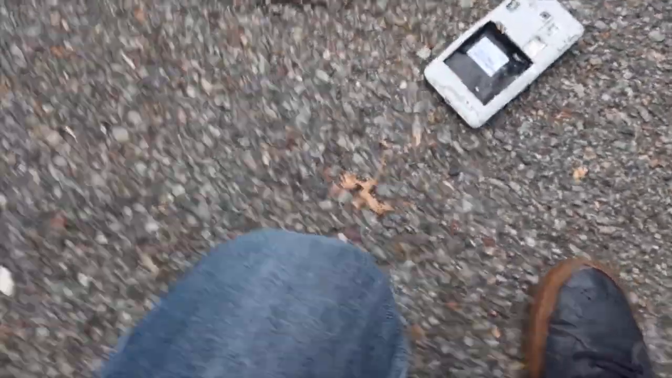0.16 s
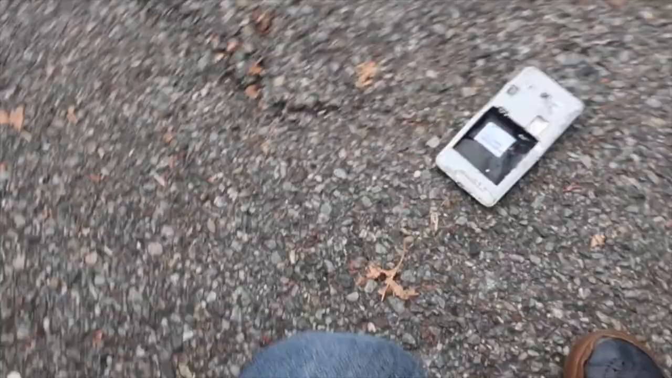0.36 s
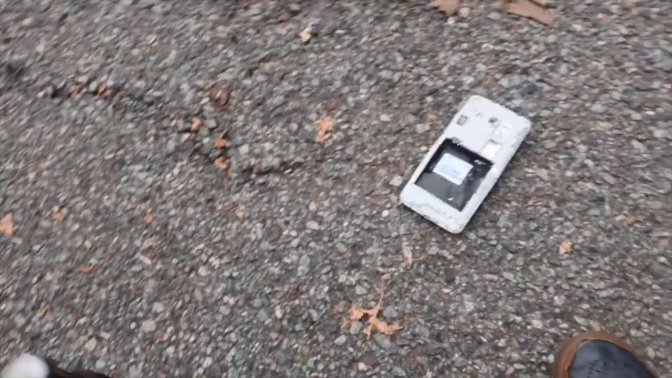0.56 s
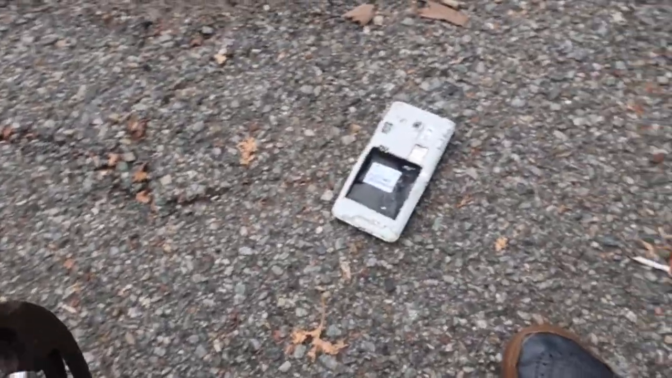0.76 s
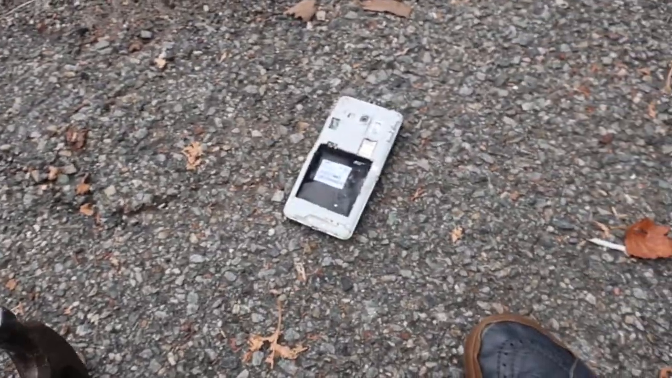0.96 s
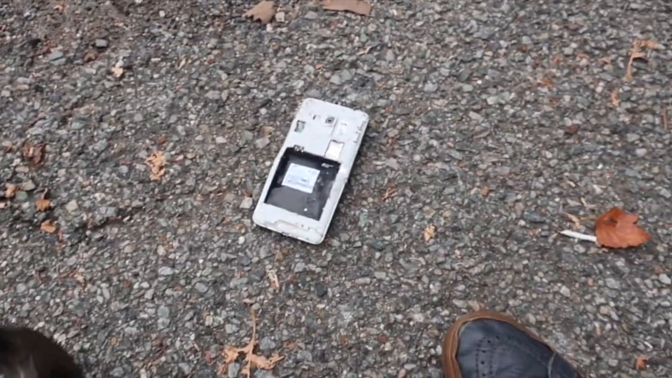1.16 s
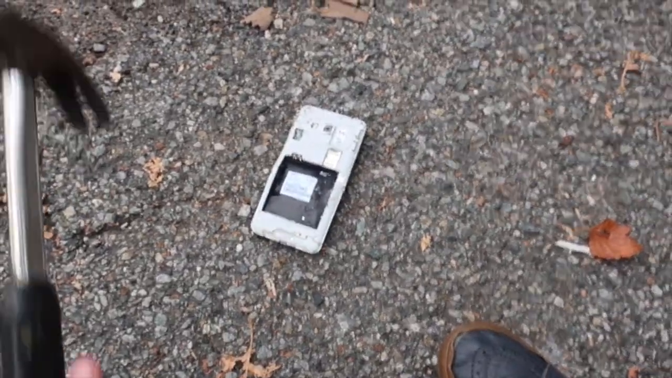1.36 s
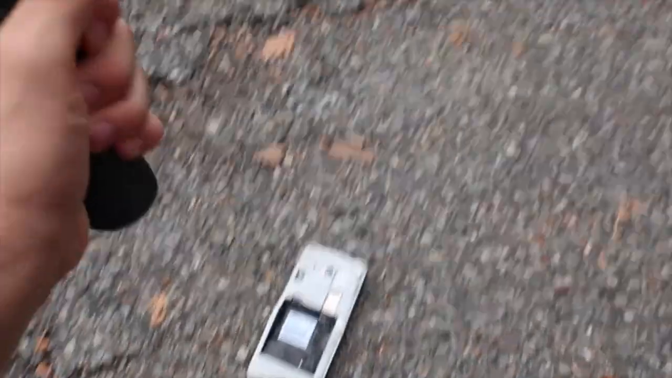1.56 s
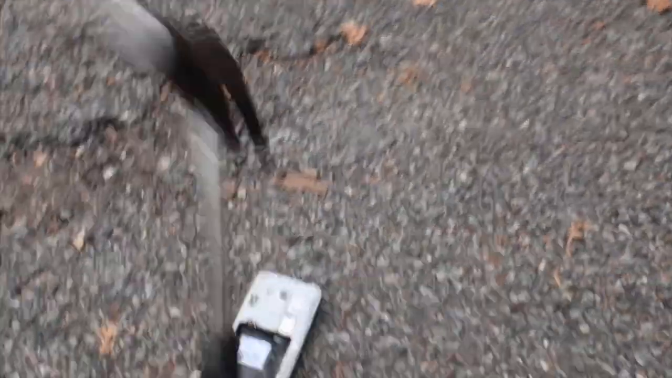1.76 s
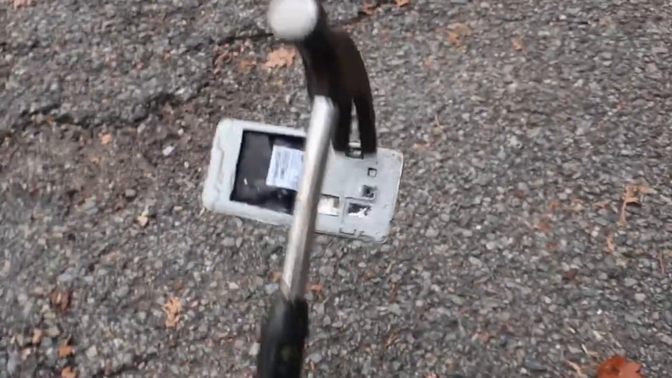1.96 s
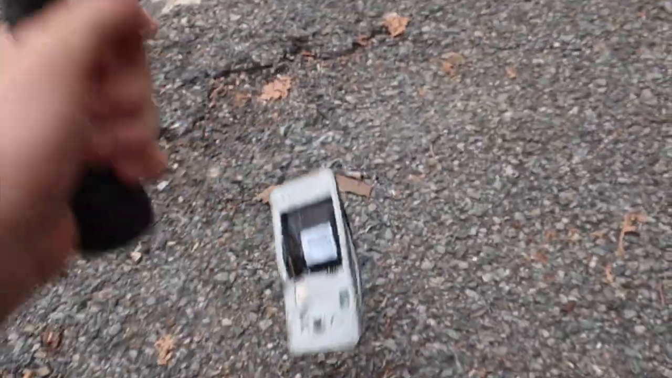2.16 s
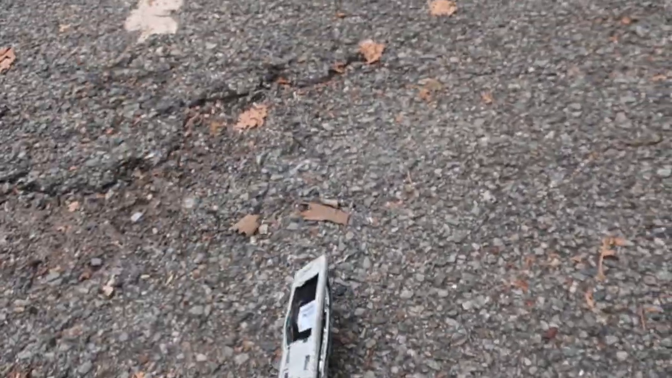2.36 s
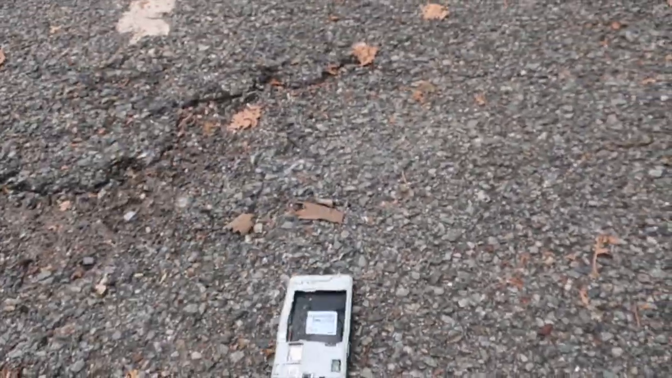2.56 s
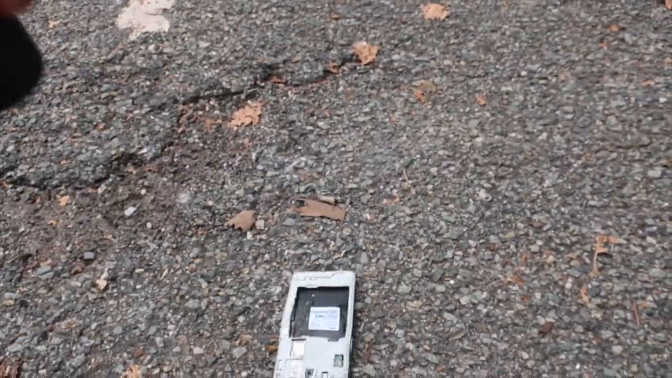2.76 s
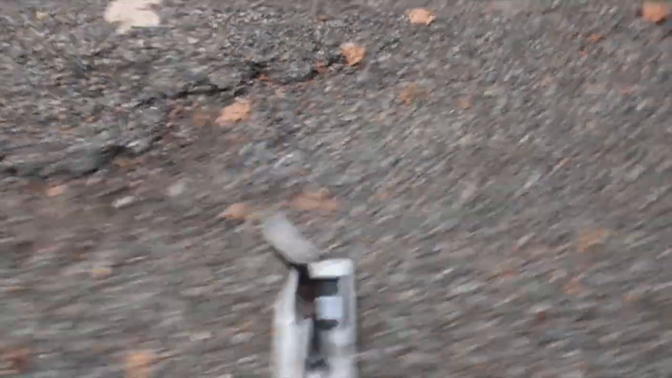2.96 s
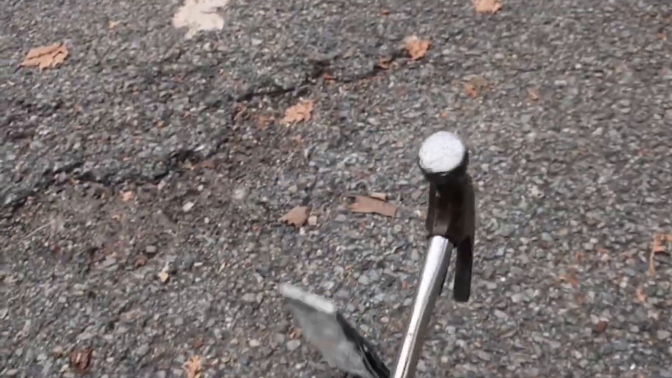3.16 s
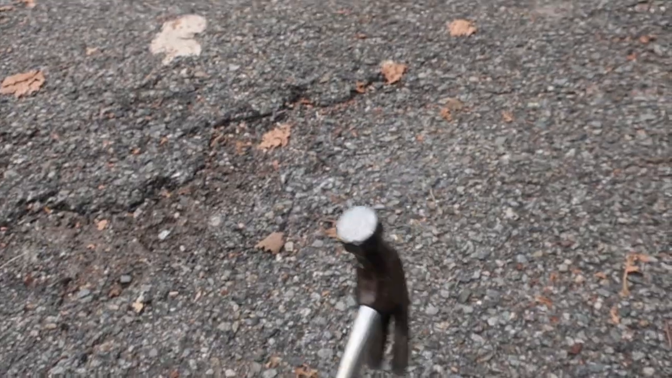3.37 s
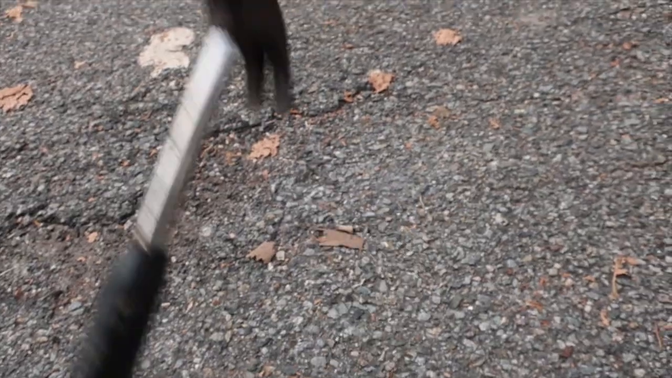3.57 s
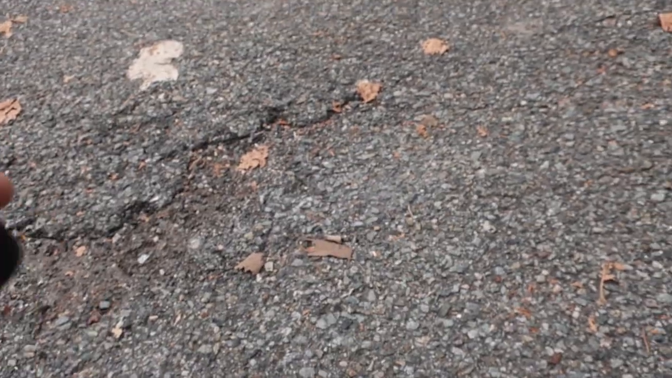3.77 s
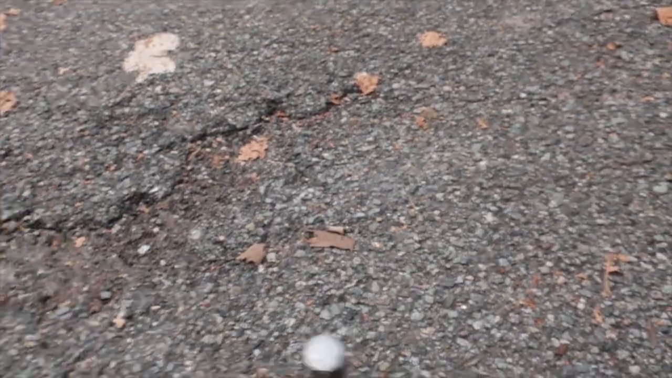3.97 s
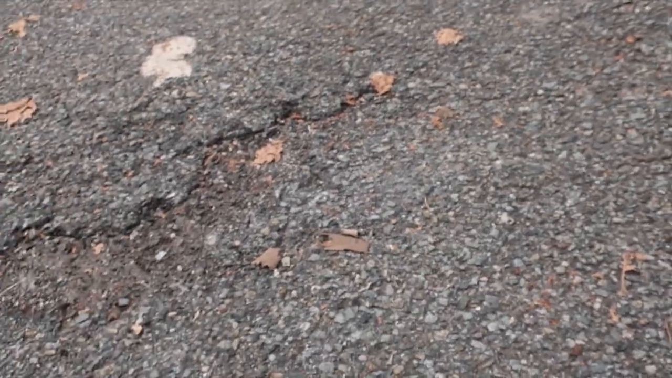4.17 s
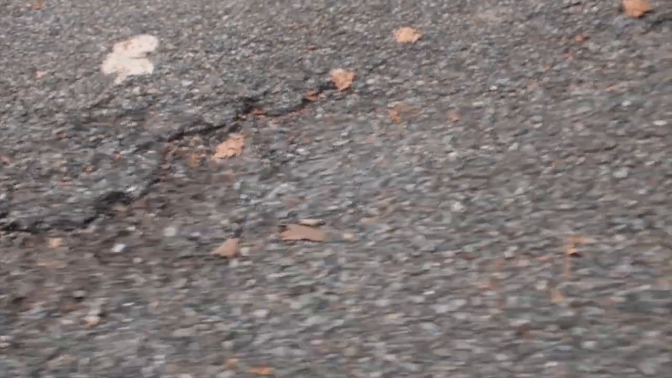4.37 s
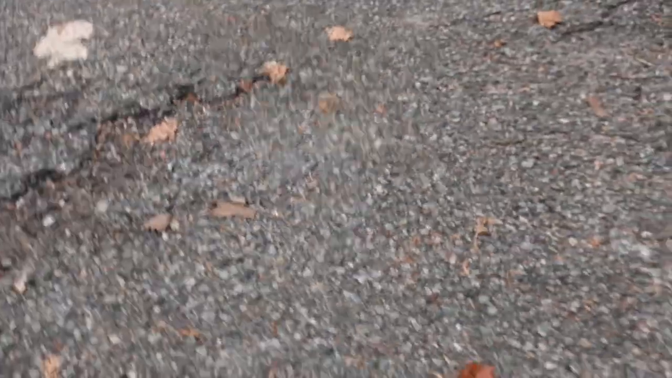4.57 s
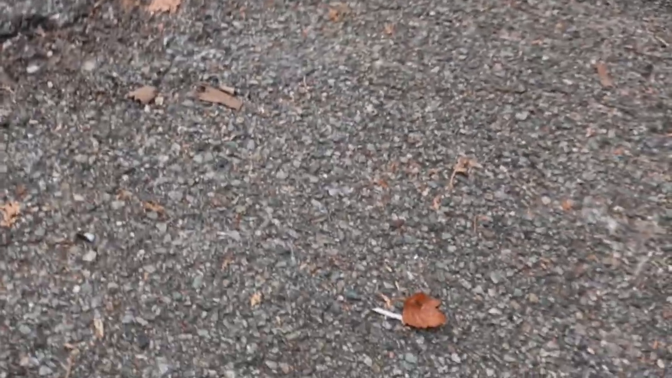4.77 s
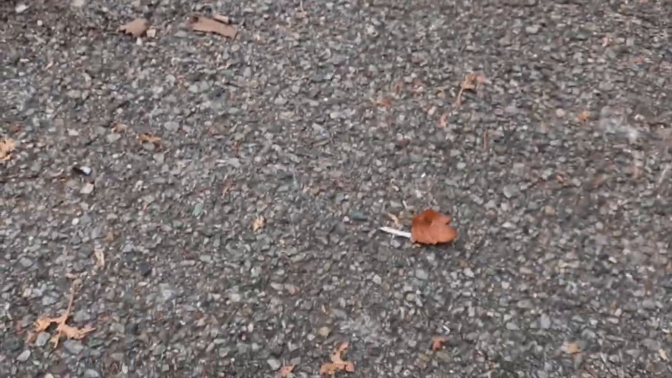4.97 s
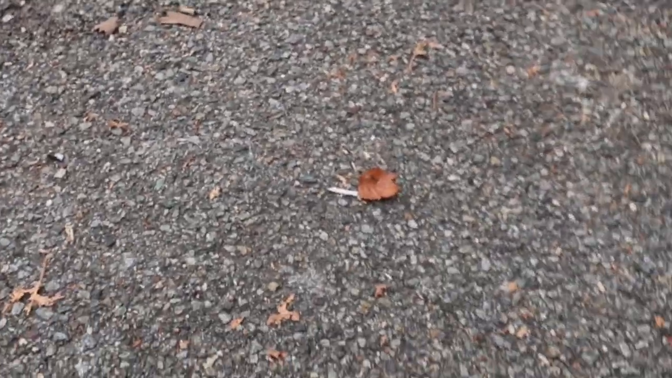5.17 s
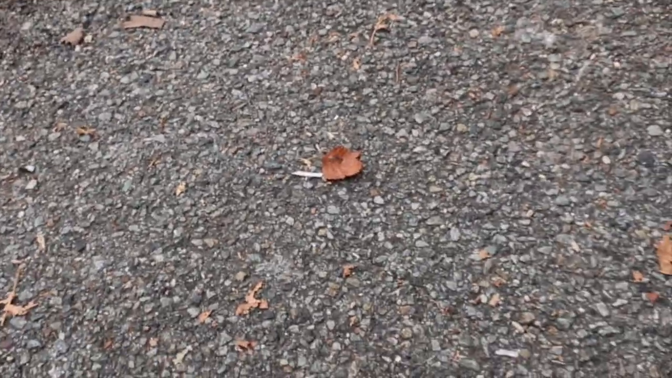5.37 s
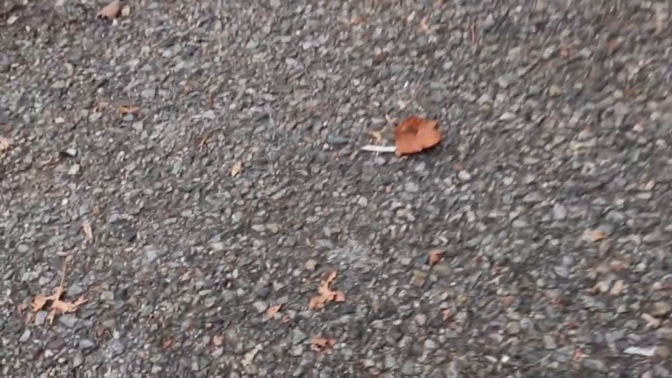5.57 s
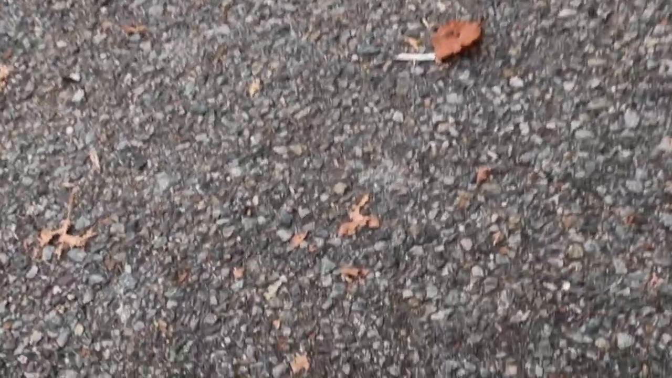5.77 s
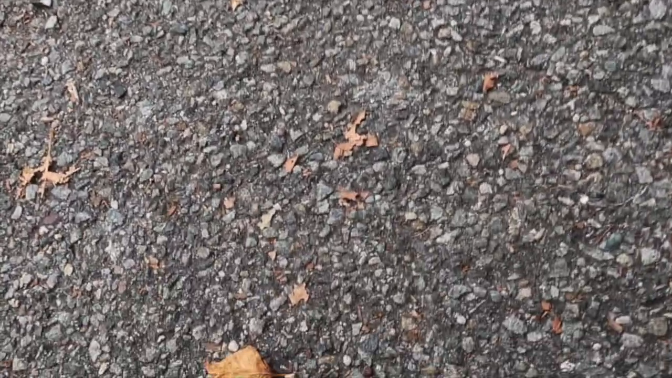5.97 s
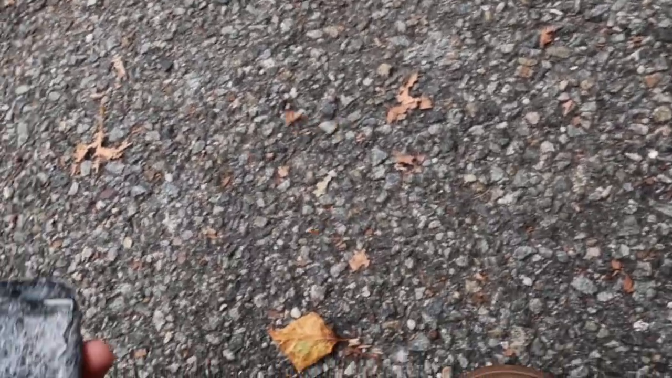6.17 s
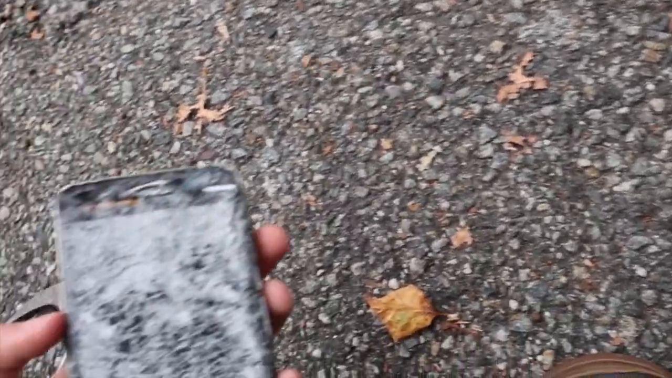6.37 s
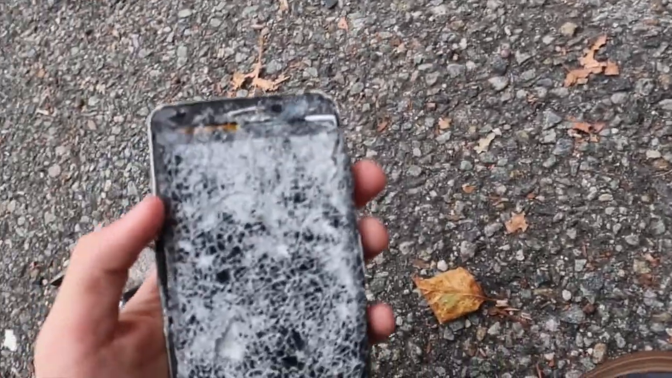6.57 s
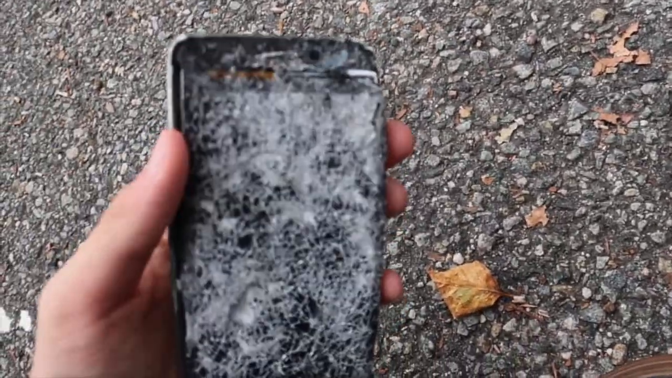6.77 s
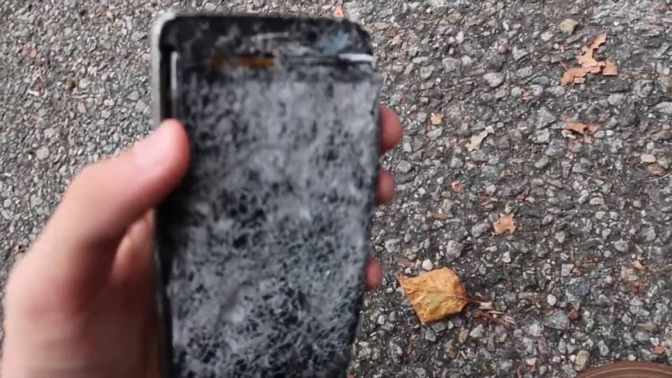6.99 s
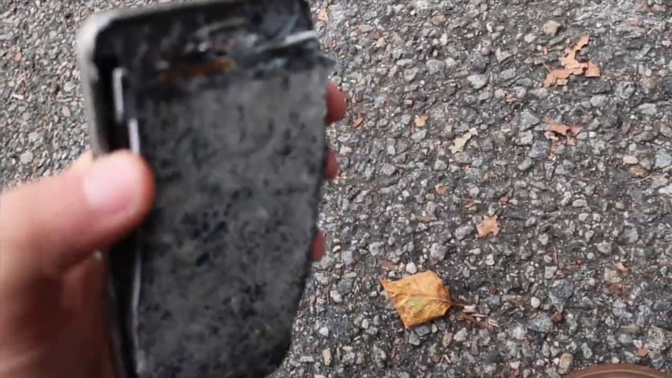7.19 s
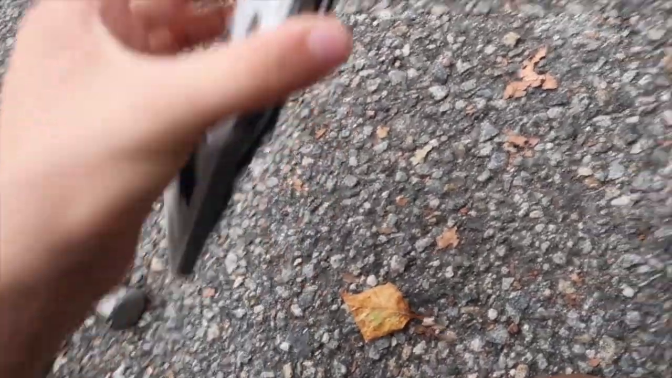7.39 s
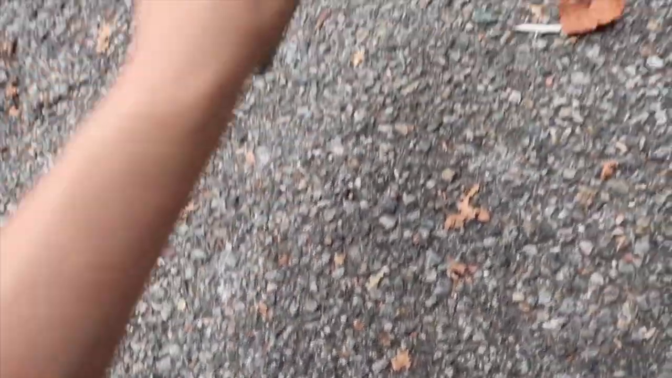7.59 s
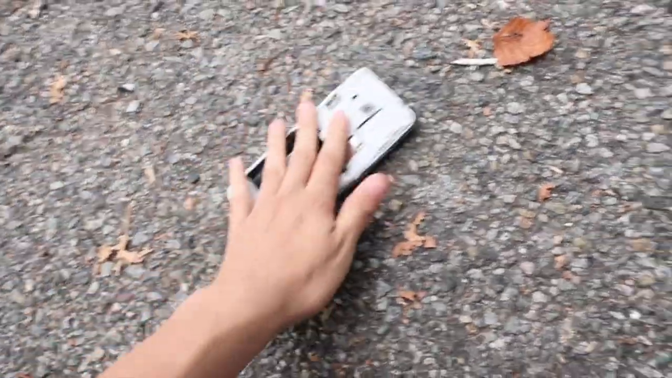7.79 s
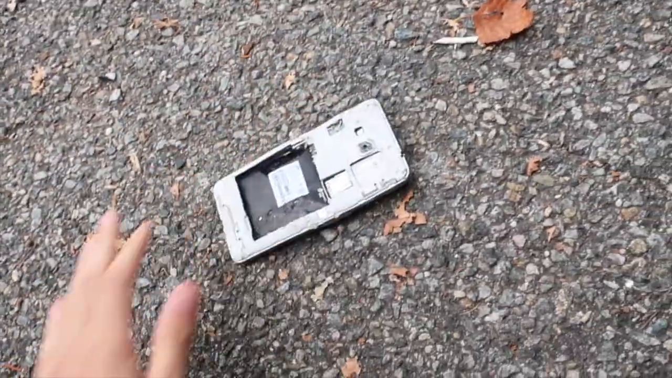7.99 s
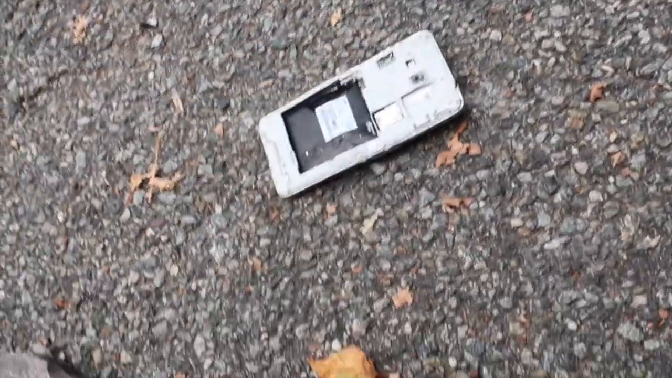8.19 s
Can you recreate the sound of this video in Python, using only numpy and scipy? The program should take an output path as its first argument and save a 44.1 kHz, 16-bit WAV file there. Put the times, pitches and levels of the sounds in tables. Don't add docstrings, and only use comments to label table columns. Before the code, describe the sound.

Outdoors, close to a handheld microphone, soft scuffs and thuds lead to a hard steel tap with small bounces. Three very short, overloaded hammer cracks crush a phone's plastic shell about a second apart, with ticks, skids and falling chips between. The hammer is laid down with a dull clink, grit and cloth rustle quietly, then the phone drops with a sharp double smack. Distant traffic rumbles throughout, dipping after each loud hit.

```python
import sys
import numpy as np
from scipy import signal
from scipy.fft import rfft, irfft
from scipy.io import wavfile
from scipy.ndimage import uniform_filter1d

SR = 44100
rng = np.random.default_rng(int(sys.argv[2]) if len(sys.argv) > 2 else 0)


def linear_from_db(decibels):
    return 10 ** (np.asarray(decibels, float) / 20)


def output_pcm(signal):
    pcm = np.clip(np.atleast_2d(signal).T, -1, 1) * 32767
    wavfile.write(sys.argv[1], SR, np.round(pcm).astype(np.int16))


N = 363384
T = np.arange(N) / SR


def band(x, hz, width):
    b, a = signal.iirpeak(min(hz, .45 * SR), max(hz / width, .3), fs=SR)
    return signal.lfilter(b, a, x)


def low(x, hz):
    return signal.sosfilt(signal.butter(N=4, Wn=min(hz, .45 * SR), fs=SR, output="sos"), x)


def unit(x):
    return x / np.sqrt(np.mean(x ** 2))


def peak(x):
    return x / np.abs(x).max()


def decay(t, t60):
    return np.exp(-np.log(1000) * t / t60)


def walk(rate):
    k = int(SR / rate)
    steps = np.repeat(rng.standard_normal(N // k + 1), k)
    return 1.3 * uniform_filter1d(uniform_filter1d(steps, k), k)[:N]


def shape(table, hz):
    f, db = np.transpose(table)
    return np.interp(np.log(hz), np.log(f), db)


def play(source, rows):
    out = np.zeros((2, N))
    for s, *row in rows:
        i = int(s * SR)
        x = source(*row)
        out[:, i:i + x.shape[-1]] += x[..., :N - i]
    return out


# (frequency [Hz], width [Hz], level [dB])
SHELL_MODES = [(410, 330, 0.5), (980, 470, 9.5), (1820, 240, 3.5), (2340, 1400, -4), (3300, 1800, -1.5),
               (4070, 800, -12), (4940, 700, -3.5), (9000, 1200, -18), (13700, 13000, -10.5)]


def blow(over_db, start_hz, end_hz, contact_ms, thump_db):
    t = np.arange(4096) / SR
    u = t / (contact_ms / 1000)
    noise = rng.standard_normal((3, len(t)))
    press = np.minimum(t / .0005, 1) * np.where(u < .85, 1, np.exp(-(u - .85) / .1))
    jitter = 1 + .7 * uniform_filter1d(noise[0], size=12)
    hz = start_hz * (end_hz / start_hz) ** np.minimum(u, 1) * jitter
    shriek = np.sin(2 * np.pi * np.cumsum(hz) / SR) * press
    crunch = noise[:1] + 0.56 * noise[1:]
    shell = sum(linear_from_db(db) * band(crunch * press, f, w) for f, w, db in SHELL_MODES)
    shell = linear_from_db(1) * shell * np.exp(-np.maximum(u - 1, 0) / .5)
    splinters = band(band(crunch, 3800, 3100), 3500, 6000) * linear_from_db(over_db / 2 - 7) * np.exp(-t / .005)
    late = np.maximum(u - .9, 0) * contact_ms / 1000
    thump = -np.sin(2 * np.pi * 225 * late) * np.exp(-(late / .0035) ** 2)
    return linear_from_db(over_db) * (shriek + shell) + splinters + linear_from_db(thump_db) * thump


# (time [s], shriek start [Hz], shriek end [Hz], contact [ms])
BLOWS = [
    (1.9103, 3300, 2300, 4.6),
    (3.0761, 2900, 4100, 4.7),
    (4.0731, 4600, 750, 4.3),
]


def hammer_blows():
    return play(blow, [(s, 9, *row, 2) for s, *row in BLOWS])


def rattle(length, db, hz, treble_db, rate):
    n = int(length * SR) + 8
    u = np.arange(2 * n + 600) / n
    chance = rng.random((3, len(u)))
    grains = (chance[0] < rate / SR) * linear_from_db(-1.5 * np.log(1 - chance[1]))
    grains = signal.lfilter([1], [1, -.96], grains + 1e-3) * (chance[2] - .5)
    grains = grains * np.minimum(u / .2, 1) * np.exp(-np.maximum(u - .4, 0) ** 2 / 0.18)
    modes = sum(linear_from_db(-5.0 * np.log2(f / hz) ** 2) * band(grains, f, .6 * w) for f, w, _ in SHELL_MODES[:7])
    body = low(modes + 0.23 * band(grains, hz, hz / 3) + 0.23 * band(grains, hz, 2 * hz), 1.52 * hz)
    treble = low(band(grains, 8000, 9000), 13500)
    return linear_from_db(db - 5.5) * (unit(body) + linear_from_db(treble_db - 6.5) * unit(treble))


# (lead-in swell level [dB], rebound level [dB], debris level [dB])
AROUND_BLOWS = [
    (-24, -27, -45),
    (-30, -46.5, -48),
    (-35, -31, -45.5),
]


def around_blows():
    rows = []
    for (s, *_), (lead_db, rebound_db, debris_db) in zip(BLOWS, AROUND_BLOWS):
        rows += [(s - .036, .05, -62, 4500, 8, 6000),
                 (s - .0064, .008, lead_db, 3300, 6, 6700),
                 (s + .0045, .005, -21, 650, -29, 5000),
                 (s + .007, .021, rebound_db, 3300, 1.5, 4500),
                 (s + .022, .13, debris_db, 3900, -3, 5000)]
    return play(rattle, rows)


def tap(db, hz, knock_db, treble_db, t60):
    t = np.arange(3000) / SR
    contact = rng.standard_normal(len(t)) * decay(t, t60)
    tick = low(band(contact, hz, hz), 1.25 * hz)
    ring = band(band(contact, hz, hz / 7), hz, hz / 3)
    knock = band(band(contact, 610, 870), 670, 1360)
    treble = band(band(contact, 10500, 9400), 10500, 9800)
    struck = 0.69 * peak(tick) + .5 * peak(ring) + linear_from_db(knock_db) * peak(knock)
    return linear_from_db(db) * struck + linear_from_db(treble_db + 10) * peak(treble)


# (time [s], peak level [dB], ring [Hz], knock level re peak [dB])
CHIPS = [
    (1.922, -17, 4150, -20),
    (1.9295, -16, 4170, -20),
    (4.1598, -31, 3810, -15),
    (4.2718, -23.5, 1680, -26),
    (4.342, -21.5, 2020, -33),
    (4.401, -21.5, 1740, -26),
    (5.123, -21, 1800, 2.5),
    (5.4946, -16.5, 1470, -7),
]


def chips():
    return play(tap, [(s, db, hz, knock, db - 36.5, .019) for s, db, hz, knock in CHIPS])


# (time [s], overload level [dB], shriek start [Hz], shriek end [Hz], contact [ms])
DROPS = [
    (7.8133, 4, 3900, 3500, 3.9),
    (7.8291, 3, 2300, 1700, 2.8),
    (.9562, -16, 3600, 1200, 2.5),
]


def drops():
    return play(blow, [(*row, -18.5) for row in DROPS])


# (time [s], peak level [dB], ring [Hz], treble level re peak [dB])
SHELL_TICKS = [(1.2445, -31.5, 4610, -35), (2.3589, -12, 2370, -23.5), (2.5103, -41.5, 4330, -5),
               (2.5879, -26, 4280, -19.5), (3.432, -11, 4000, -31), (3.5451, -26.5, 4200, -26),
               (4.2215, -32.5, 3080, -21), (4.2697, -28, 4100, -26), (5.87, -36.5, 4500, -40),
               (5.918, -26.5, 4600, -35.5), (5.957, -31, 4300, -40)]


def shell_ticks():
    return play(tap, [(s, db, hz, -11, db + top, .017) for s, db, hz, top in SHELL_TICKS])


# (time [s], length [s], rms level [dB], centre [Hz], treble level [dB])
SKIDS = [(.953, 0.0059, -36, 3500, -10), (1.933, .035, -41, 3000, -2), (2.332, 0.015, -27.5, 3300, -3),
         (2.349, 0.026, -24, 3000, -4), (2.512, 0.018, -44.5, 4630, 1), (2.591, 0.01, -34, 4070, -6),
         (2.67, .018, -51, 3450, -6), (3.268, 0.026, -44, 2400, -2.5), (3.42, .035, -35, 2830, -0.5),
         (3.539, 0.015, -38, 2900, -8), (4.23, 0.024, -37.5, 4540, -8.5), (4.282, .12, -45, 4270, -7.5),
         (4.368, 0.12, -50, 4570, -7), (5.057, 0.017, -32.5, 4170, -10), (7.821, 0.013, -26, 2530, 4.5),
         (7.829, 0.032, -29.5, 3500, 3), (7.853, 0.097, -38.5, 2560, -7), (7.941, 0.049, -41.5, 4300, -8.5),
         (7.99, 0.04, -49.5, 4000, -10), (8.025, 0.097, -49.5, 2190, -13.5)]


def skids():
    return play(rattle, [(*row, 3500) for row in SKIDS])


# (time [s], length [s], rms level [dB], centre [Hz])
BUMPS = [
    (0.31, 0.013, -21, 870),
    (2.348, 0.025, -32, 1015),
    (3.422, 0.025, -33, 1170),
    (4.956, .045, -35, 1170),
    (5.264, .008, -24, 686),
    (5.551, .045, -29.5, 970),
    (7.81, 0.027, -26, 780),
]


def bumps():
    return play(rattle, [(*row, -24, 1600) for row in BUMPS])


# (frequency [Hz], level [dB], t60 [s])
STEEL_MODES = [(1360, 2, .012), (1880, -3, .008), (2420, -4, .008), (3190, -1, .005), (4410, -4, .009),
               (5700, -2, .012), (7460, -20, .01), (8950, -17, .035)]


def clink(db, tilt_db):
    t = np.arange(4000) / SR
    modes = 0
    for f, mode_db, t60 in STEEL_MODES:
        level_chance, pitch_chance = rng.standard_normal(2)
        level = linear_from_db(mode_db + 2 * level_chance + tilt_db * np.log2(f / 3000))
        modes = modes + level * np.sin(2 * np.pi * f * (1 + 0.0086 * pitch_chance) * t) * decay(t, t60)
    tick = low(band(rng.standard_normal(len(t)) * np.exp(-t / .0012), 2000, 4000), 5000)
    return linear_from_db(db) * peak(modes * np.minimum(t / .0009, 1) + linear_from_db(5) * tick)


# (time [s], peak level [dB], tilt [dB per octave])
CLINKS = [
    (5.2537, -19.5, -8),
    (5.2684, -3, -5),
    (5.3324, -17, -5.5),
    (5.3565, -11, 1),
]


def clinks():
    return play(clink, CLINKS)


# (time [s], peak level [dB], ring [Hz], knock level re peak [dB])
STEEL_TICKS = [
    (0.9551, -2.5, 9050, -6),
    (1.038, -10.5, 6800, -9.5),
    (1.0688, -19, 4830, -17),
    (1.0739, -17, 6550, -1),
    (1.0909, -30.5, 6500, 9),
    (5.0625, -11, 5360, -2),
]


def steel_ticks():
    rows = [(s, db, hz, knock, db - 25, .009) for s, db, hz, knock in STEEL_TICKS]
    claw = (5.0664, -20, 8490, -20.5, -48.5, .05)
    return play(tap, rows + [claw])


def thud(db, hz, t60):
    t = np.arange(6000) / SR
    return linear_from_db(db) * np.sin(2 * np.pi * hz * t) * decay(t, max(t60, .01))


# (time [s], peak level [dB], pitch [Hz], t60 [s])
THUDS = [
    (0.313, -14, 169, 0.025),
    (0.9573, -5.5, 230, 0.029),
    (.965, -16, 378, 0.045),
    (0.602, -9.5, 204, 0.042),
    (4.958, -13, 259, 0.026),
    (5.548, -9, 245, 0.027),
    (5.565, -14, 380, 0.032),
    (5.58, -16.5, 150, 0.03),
]


def thuds():
    return play(thud, THUDS)


# (time [s], peak level [dB], treble level re peak [dB])
GRIT = [(0.5026, -31.5, -25.5), (1.112, -39.5, -23.5), (1.2271, -38, -38), (1.5549, -41, -16),
        (1.6615, -26.5, -28), (3.2441, -38.5, -18), (5.2144, -46, -4), (5.5692, -28.5, -35),
        (5.8085, -34, -15.5), (6.082, -36.5, -18), (6.3842, -35, -19.5), (6.7494, -33.5, -22),
        (7.2444, -48, -6), (7.5151, -34.5, -16)]


def grit():
    return play(tap, [(s, db, 3000, 1.5, db + top, .017) for s, db, top in GRIT])


# (time [s], peak level [dB])
SCUFFS = [
    (.2731, -26),
    (.3038, -35),
    (.3124, -30.5),
]


def scuffs():
    return play(tap, [(s, db, 3060, 14, db - 14.5, .014) for s, db in SCUFFS])


# (time [s], length [s], rms level [dB], treble level [dB])
RUSTLES = [(.23, 0.12, -52.5, 1), (.965, .07, -67, 9), (1.3, 0.22, -69, 11), (1.63, 0.081, -52, -2),
           (2.37, 0.074, -53.5, 1), (2.75, 0.54, -54.5, -21), (3.35, .04, -57, -2), (3.58, .024, -60, 2),
           (3.85, 0.053, -66, 9), (4.49, .061, -58.5, -1.5), (5.08, .066, -61, 4), (5.85, .12, -55, -25),
           (6.35, .1, -51, -5), (6.52, .04, -67, 10), (7.23, .05, -66, 12), (7.38, .12, -69, 10.5),
           (7.784, 0.054, -52, 15.5), (8.1, .18, -64, -8)]


def rustles():
    return play(rattle, [(s, length, db, 4500, top, 3000) for s, length, db, top in RUSTLES])


def ports(x):
    apart = linear_from_db(-6) * signal.lfilter([1, -1], [1, -.5], band(x, 9000, 12000))
    return x + np.array([apart, -apart])


# (time [s], pitch [Hz], level [dB])
ENGINE = [
    (3.2, 73, -41),
    (3.376, 73.4, -34.5),
    (3.716, 77.1, -37),
    (3.796, 72.3, -38),
    (3.948, 77.8, -44.5),
    (4.05, 80.4, -36.5),
]


def engine():
    s, hz, db = np.transpose(ENGINE)
    fade = np.clip((T - s[0]) / 0.28, 0, 1) * np.clip((s[-1] - T) / 0.12, 0, 1)
    hum = np.sin(2 * np.pi * np.cumsum(np.interp(T, s, hz)) / SR)
    return np.sqrt(2) * fade * linear_from_db(np.interp(T, s, db)) * hum


# (frequency [Hz], density [dB per Hz])
ROAD = [(12, -40), (20, -25), (48, -0.5), (102, 0), (123, -2), (153, -7), (184, -5.5), (291, -12),
        (423, -15.5), (496, -20), (762, -16.5), (1610, -20.5), (2540, -29), (4700, -46), (12000, -75),
        (15600, -91.5), (22000, -120)]
# (frequency [Hz], density [dB per Hz])
ROAD_SIDE = [(24, -44), (40, -19), (76, -18), (160, -21), (216, -12.5), (454, -5), (527, -10), (910, -1.5),
             (1110, -4), (1960, -4.5), (6780, -24), (10300, -25), (15000, -40.5)]
# (time [s], level re road noise [dB])
RUMBLE = [(0, 2), (.8, 3), (1.0, 1), (1.7, -1), (2.0, 0), (2.3, -0.5), (2.999, 1), (3.9, 0), (4.2, -1.5),
          (4.7, .6), (5.5, -0.5), (6.4, 0.5), (7.5, 1), (8.24, 2)]


def traffic():
    s, rumble_db = np.transpose(RUMBLE)
    out, swell = 0, walk(1.2)
    f = np.maximum(np.fft.rfftfreq(N, 1 / SR), 1)
    colour = [linear_from_db(shape(ROAD, f)), linear_from_db(shape(ROAD_SIDE, f) - 26.5)]
    mid, side = rfft(rng.standard_normal((2, N))) * colour
    scale = np.sqrt(np.mean(irfft(mid * (f > 400) * (f < 2500), N) ** 2))
    for hz in 22 * 2 ** np.arange(0, 9.6, .5):
        share = np.cos(np.pi * np.clip(np.log2(f / hz), -.5, .5)) ** 2
        bass = 1 / (1 + (hz / 300) ** 2)
        flicker = (1.55 + 0.4 * bass) * walk(6)
        gain = linear_from_db(bass * np.interp(T, s, rumble_db) + .5 * swell + flicker)
        out = out + gain * irfft(np.array([mid + side, mid - side]) * share, N)
    return out / scale * linear_from_db(-33 + ducking())


def flecks():
    out = 0
    for hz in 7600 * 1.11 ** np.arange(6):
        noise = rng.standard_normal(N) + .5 * rng.standard_normal((2, N))
        patches = linear_from_db(5.5 * walk(35))
        out = out + patches * unit(band(band(noise, hz, hz / 14), hz, hz / 14))
    return out * linear_from_db(-83 + 1.8 * walk(5.1) + ducking())


def hiss():
    noise = rng.standard_normal(N) + .8 * rng.standard_normal((2, N))
    return linear_from_db(-60.5 + .6 * ducking() + 2.1 * walk(13)) * unit(low(band(noise, 5200, 4000), 6600))


# (time [s], gain [dB])
DUCKS = [
    (0.961, -4),
    (1.919, -12.5),
    (3.085, -13.5),
    (4.081, -15),
    (5.275, -7.5),
    (7.829, -12),
]


def ducking():
    hold_s, creep_db_per_s = .25, 9.5
    db = np.zeros(N)
    for s, depth_db in DUCKS:
        creep = creep_db_per_s * np.maximum(T - s - hold_s, 0)
        db = np.where(T >= s, np.minimum(depth_db + creep, 0), db)
    return uniform_filter1d(db, size=600)


def scene():
    hits = hammer_blows() + drops() + thuds()
    near = around_blows() + chips() + shell_ticks() + skids() + bumps()
    near = near + clinks() + steel_ticks() + grit() + scuffs() + rustles()
    background = engine() + traffic() + flecks() + hiss()
    edge = np.clip(np.minimum(T, T[::-1]) / .003, 0, 1)
    return edge * (hits + ports(near[0]) + background)


def band_limit(x):
    return signal.sosfilt(signal.butter(12, 15800, fs=SR, output="sos"), x)


def record(dry):
    flat = np.clip(dry, -.97, .97)
    treble = signal.butter(N=2, Wn=7000, btype="high", fs=SR, output="sos")
    flat = flat - 0.37 * signal.sosfiltfilt(treble, flat.mean(axis=0))
    top_cut = signal.butter(N=6, Wn=15000, fs=SR, output="sos")
    mix = signal.sosfiltfilt(top_cut, flat)
    return band_limit(mix)


dry = scene()
out = record(dry)
output_pcm(out)
```